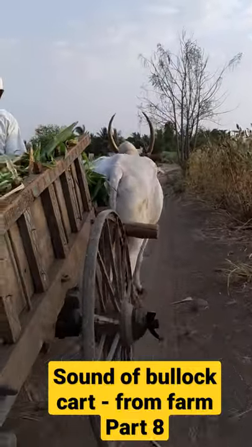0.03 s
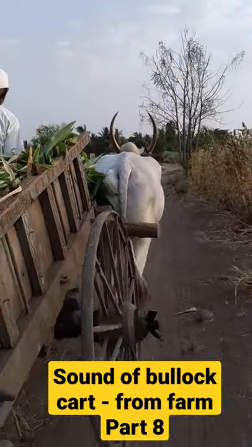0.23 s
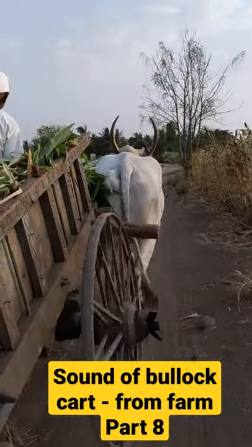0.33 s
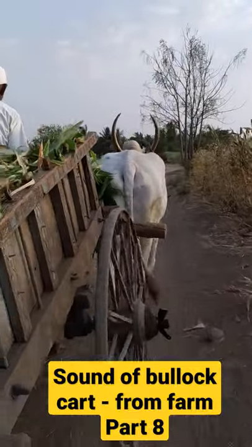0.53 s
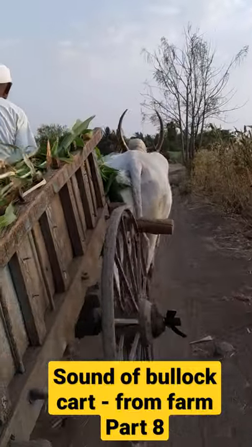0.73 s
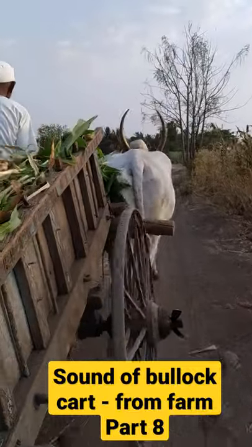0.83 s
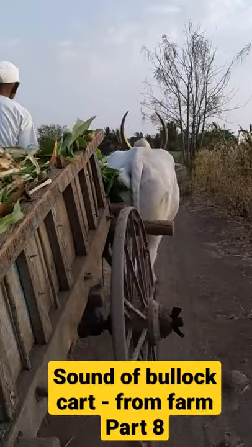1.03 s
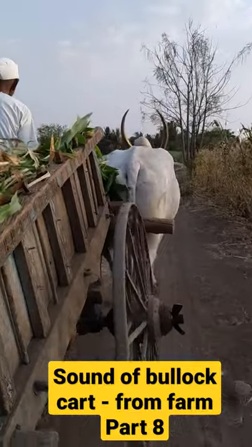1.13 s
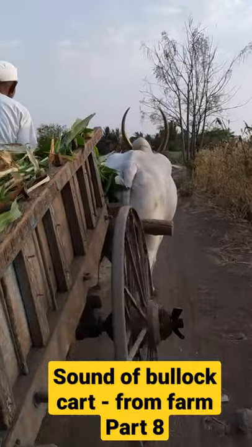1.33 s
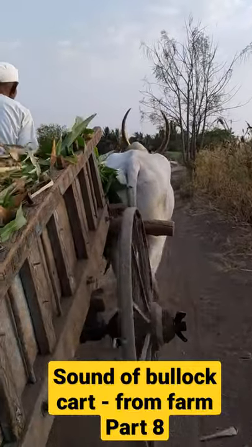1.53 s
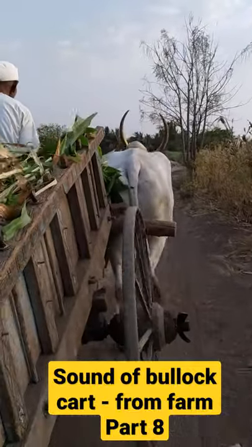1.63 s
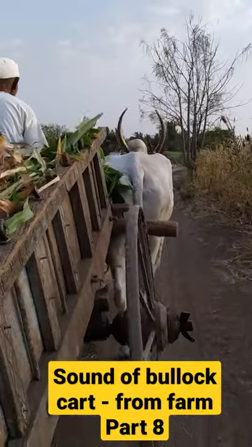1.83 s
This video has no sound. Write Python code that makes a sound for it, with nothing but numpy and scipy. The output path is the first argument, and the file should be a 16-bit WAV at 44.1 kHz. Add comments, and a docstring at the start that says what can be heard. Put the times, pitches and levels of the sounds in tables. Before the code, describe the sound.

Two bright metallic clatters from a rolling bullock cart, with dull wooden knocks and dry cracks between and after them, faint gritty rolling and fading low wind on a dirt track, close stereo phone microphone.

```python
"""Twice loose ironwork clanks in a quick rattle and the iron rings on, as a wooden ox cart rolls by on dirt.
The place is a dirt track; a stereo phone follows close behind the cart, its left microphone the nearer to it.
Iron and planks are decaying modes struck by clicks and short noise; the iron also throws a crash of noise.
The frame knocks, rumbles under random jolts and snaps in bursts of noise; dirt hisses in flickering bands.
Low thuds are short damped sines, and the wind at the microphones is gusty low noise that dies down."""
import sys
import numpy as np
from scipy import signal
from scipy.fft import rfft, irfft
from scipy.io import wavfile
from scipy.ndimage import uniform_filter1d

SR = 44100
rng = np.random.default_rng(int(sys.argv[2]) if len(sys.argv) > 2 else 0)


def transcribe(signal):
    """Save signal, clipped to [-1, 1], as a 16-bit WAV file at the path in sys.argv[1]."""
    frames = np.atleast_2d(signal).T
    limited = np.clip(frames, -1, 1)
    pcm = np.round(limited * 32767).astype(np.int16)
    wavfile.write(sys.argv[1], SR, pcm)


N = 81585

# Blows of the loose ironwork: (time [s], then for each of the six groups of modes: level [dB])
IRON_BLOWS = [(0.22, -32, -19, -24, -30, -20.5, -24), (0.2445, -28, -19.5, -23, -27, -26, -18),
              (0.2477, -29.5, -15, -54, -11, -14.5, -6.5), (0.256, -21.5, -26.5, -47, -23, -8.5, -13.5),
              (0.2601, -39.5, -15, -17, -27, -34, -14), (0.2769, -33.5, -22, -28.5, -26.5, -50, -22),
              (0.3112, -41, -62, -40.5, -60, -33, -34), (0.3297, -50, -55, -44, -42.5, -44, -33),
              (0.5548, -47, -41, -37, -39.5, -41.5, -48), (0.8654, -30.5, -35.5, -25, -26.5, -22.5, -57),
              (0.8875, -24.5, -21.5, -19.5, -19, -44, -21), (0.8955, -20, -14, -17.5, -34, -21, -15.5),
              (0.9, -27, -19, -9, -14.5, -18.5, -12), (0.9056, -20, -25, -18, -40, -10, -19),
              (0.9124, -33, -26, -22, -34, -41, -24.5), (1.1312, -44, -41, -39.5, -46, -49, -35.5)]
# Edges of those groups of modes: [Hz]
GROUP_EDGES_HZ = [900, 2460, 3100, 5900, 7500, 9000, 15500]
# Modes of hub iron and tyre: (frequency [Hz], level [dB], t60 [s])
IRON_MODES = [(1050, -32, 1), (1111, -24.5, 0.35), (1578, -28, 0.29), (2097, -15, 0.24), (2232, -15, 0.43),
              (2343, -13.5, 0.099), (2567, -9.5, 0.12), (2648, -22, 0.1), (3365, -20.5, 0.22),
              (3490, -20.5, 0.16), (4440, 5.5, 0.018), (4790, 10, 0.0096), (5247, -6, 0.05),
              (6760, 1, 0.047), (8066, 8, 0.011), (9830, 1.5, 0.016)]
# Knocks of the frame: (time [s], level [dB], pitch of the planks struck [Hz])
FRAME_KNOCKS = [(0.034, -28.5, 466), (0.074, -33.5, 547), (0.096, -29, 184), (0.163, -37.5, 624),
                (0.197, -32.5, 641.6), (0.222, -17.5, 434), (0.247, -15.5, 436), (0.261, -16, 820),
                (0.298, -25, 1002), (0.629, -37.5, 600), (0.708, -25.5, 246), (0.756, -35, 597),
                (0.788, -32, 610), (0.865, -23, 500), (0.905, -19, 495), (1.041, -31, 536),
                (1.065, -33, 211), (1.128, -34.5, 528), (1.3, -40.5, 577), (1.421, -43, 553),
                (1.459, -36, 660), (1.578, -31, 652), (1.637, -36, 625), (1.682, -28.5, 573),
                (1.694, -31, 207)]
# Modes of the planks: (frequency [Hz], level [dB], t60 [s])
PLANK_MODES = [(203.6, -0.5, 0.062), (248, 1, 0.047), (418.3, -11, 0.064), (481, -5.5, 0.064),
               (553.3, 0, 0.033), (606, -0.5, 0.041), (725, -6.5, 0.039), (815.5, -3.5, 0.046),
               (923, 1, 0.028), (1055, -12.5, 0.043), (1276, -8, 0.051), (1562, -6, 0.035)]
# Dry snaps and scrapes of wood: (time [s], level [dB], low edge [Hz], high edge [Hz], t60 [s])
WOOD_SNAPS = [(0.3956, -15.5, 700, 1260, 0.019), (0.437, -27, 3800, 4670, 0.049),
              (0.47, -34, 1500, 11090, 0.072), (1.0423, -22.5, 1170, 10600, 0.029),
              (1.11, -32, 1160, 11100, 0.16), (1.745, -28, 2200, 2660, .07)]
# The cart's progress: (time [s], level of the frame's rumble [dB], level of the hiss of dirt [dB])
ROLLING_LEVELS = [(0, -54.5, -50.5), (0.199, -48, -47.5), (.36, -42, -48.5), (.52, -46, -50),
                  (0.659, -54, -50), (0.727, -40.5, -45.5), (.84, -53.5, -46), (1.0, -49, -49),
                  (1.15, -51.5, -54), (1.3, -58, -50.5), (1.52, -55.5, -51), (1.698, -47, -47),
                  (1.82, -55, -51)]
# Relative spectrum of the dirt's hiss: (frequency [Hz], level [dB per Hz])
DIRT_COLOUR = [(530, -39), (900, 16), (1070, -3.5), (1340, -3.5), (2190, 1.5), (3960, -1.5), (4410, -9),
               (8450, 4), (16000, -10.5)]
# Low thuds: (time [s], level before a 3 dB lift [dB], pitch [Hz])
LOW_THUDS = [(0.239, -33.5, 32), (0.688, -33, 88.12), (1.107, -43, 60), (1.279, -41, 65),
             (1.547, -43.5, 76), (1.842, -40, 91)]

# ALIKE: share of noise power common to both microphones; PAN: left over right; LAG: right after left
IRON_LAG_S, IRON_ALIKE, IRON_PAN_DB = 0.0001, 0.55, 2.5
SCRAPE_S, SCRAPE_DB = 0.0076, -2.5  # contact noise of a blow: decay time constant, level
RISE_T60_S = 0.0065  # build-up of an iron mode and of the crash
SPLIT = 0.01337  # largest relative distance of a mode's two weaker neighbours
WOBBLE_DB = 3  # bound of the random level wobble of each iron mode, up or down
CRASH_DB, CRASH_T60_S, CRASH_SLOPE = -8, 0.13, 0.55  # dense small modes: t60 at 2 kHz, shorter above
LINGER_DB, LINGER = -19.5, 2.63  # a weaker part of the crash lasts this many times longer
CRACKLE_DB = 2  # grain of the crash

WOOD_LAG_S, WOOD_ALIKE, WOOD_PAN_DB = 0.00021, 0.96, 0.5
KNOCK_S, KNOCK_RISE_T60_S = 0.0069, 0.016  # time to the peak of a knock's push; mode build-up at 500 Hz
SPREAD_OCT, FAR_DB = 0.18, -9  # reach of a knock around its pitch; share of every plank, near or far
RASP_DB = 17  # the rasp of wood on wood in each knock
RUMBLE_PER_S, RUMBLE_SCATTER_DB = 630, 1.5  # mean rate of jolts on each mode; scatter common to all
SNAP_PAN_DB = 1.9

DIRT_FLICKER_DB = 1.7
WIND_HZ, WIND_ALIKE, WIND_PAN_DB = 43, 0.73, 1.5
WIND_DB, WIND_DB_PER_S = -48.5, -4.5  # the wind dies down
TOP_HZ = 15700


def iron():
    """Each blow, a click with a short scrape, rings the modes and throws a crash of many small ones."""
    rows = np.array(IRON_BLOWS)
    t = np.arange(13230) / SR
    fade = np.exp(-t[:882] / SCRAPE_S)
    scrape_gain = undb(SCRAPE_DB) / np.sqrt(SCRAPE_S * SR / 2)
    click = t[:len(fade)] == 0
    blows = [scrape_gain * pair(len(fade), IRON_ALIKE) * fade + click for _ in rows]
    bursts = [pair(len(t), IRON_ALIKE) for _ in rows]
    # each mode is a close trio, the outer two 5 dB weaker
    trios = [(hz * (1 + SPLIT * step * rng.uniform(0.34, 1)), db - 5 * abs(step), t60)
             for hz, db, t60 in IRON_MODES for step in (-1, 0, 1)]
    out = 0
    for k, (lo, hi) in enumerate(zip(GROUP_EDGES_HZ, GROUP_EDGES_HZ[1:])):
        gains = undb(rows[:, k + 1])
        force = place(rows[:, 0], gains, blows)
        for hz, db, t60 in trios:
            if lo <= hz < hi:
                wobble = WOBBLE_DB * np.tanh(walk(70.88))
                out = out + undb(db + wobble) * swell(force, hz, t60, RISE_T60_S)
        out = out + crash(rows[:, 0], gains, bursts, lo, hi)
    return ports(out, IRON_LAG_S, IRON_PAN_DB)


def crash(times, gains, bursts, lo, hi):
    """Modes too dense to hear apart: noise in one band with a swift rise, a decay and a weak longer tail."""
    t = np.arange(bursts[0].shape[1]) / SR
    t60 = CRASH_T60_S * (np.sqrt(lo * hi) / 2000) ** -CRASH_SLOPE
    decay = undb(-60 * t / t60)
    linger = undb(LINGER_DB - 60 * t / (LINGER * t60))
    rise = (1 + undb(LINGER_DB)) * undb(-60 * t / RISE_T60_S)
    tail = decay + linger - rise
    noise = place(times, gains, [burst * tail for burst in bursts])
    crackling = noise * undb(CRACKLE_DB * walk(500))
    width_gain = np.sqrt(SR / 2 / (hi - lo))  # makes up for the power lost in a narrow band
    return undb(CRASH_DB) * width_gain * band(crackling, max(lo, 1900), hi)


def frame():
    """Soft knocks favour the planks near their pitch; many small jolts, each plank its own, keep up a rumble."""
    rows = np.array(FRAME_KNOCKS)
    times, levels, pitches = rows.T
    t = np.arange(1764) / SR
    fade = t * np.exp(-t / KNOCK_S)
    fade = fade / np.sqrt(np.sum(fade ** 2))
    # a click opens each push
    pushes = [pair(len(t), WOOD_ALIKE) * fade + (t == 0) for _ in rows]
    jolt_force = undb(RUMBLE_SCATTER_DB * walk(34.81))
    knocks = rumble = 0
    for hz, db, t60 in PLANK_MODES:
        octaves = np.log2(hz / pitches)
        near = np.exp(-0.5 * (octaves / SPREAD_OCT) ** 2) + undb(FAR_DB)
        push = place(times, undb(levels) * near, pushes)
        knocks = knocks + undb(db) * swell(push, hz, t60, KNOCK_RISE_T60_S * 500 / hz)
        struck = rng.random(N) < RUMBLE_PER_S / SR
        jolts = struck * pair(N, WOOD_ALIKE) * jolt_force * undb(4.8 * walk(20.37))
        rumble = rumble + undb(db) * ring(jolts, hz, t60)
    rubbing = place(times, undb(levels), [push * (t > 0) for push in pushes])  # without the click
    rasp = undb(RASP_DB) * band(rubbing, 1030, 3740)
    planks = band(knocks + curve(column=1) * unit(rumble), 99, 6300)
    return ports(rasp + planks, WOOD_LAG_S, WOOD_PAN_DB)


def snaps():
    """Short cracks without a ring: decaying noise, each in its own band."""
    rows = np.array(WOOD_SNAPS)
    t = np.arange(4410) / SR
    onset = 1 - np.exp(-t / 0.00083)
    cracks = []
    for _, _, lo, hi, t60 in WOOD_SNAPS:
        burst = pair(len(t), IRON_ALIKE) * undb(-60 * t / t60) * onset
        cracks.append(band(burst, lo, hi))
    return ports(place(rows[:, 0], undb(rows[:, 1]), cracks), IRON_LAG_S, SNAP_PAN_DB)


def dirt():
    """Hiss under the wheel: third-octave bands of noise that flicker, unrelated left and right."""
    colour = np.array(DIRT_COLOUR)
    out = 0
    for hz in 1000 * 2 ** np.arange(0, 4.1, 1 / 3):
        db = np.interp(np.log(hz), np.log(colour[:, 0]), colour[:, 1])
        flicker = DIRT_FLICKER_DB * walk(30.18)
        pan = sides(4 if hz > 8000 else 1.1)
        hiss = band(rng.standard_normal((2, N)), hz / 2 ** (1 / 6), hz * 2 ** (1 / 6))
        out = out + undb(db + flicker) * pan * hiss
    return unit(out) * curve(column=2)


def thuds():
    """Low damped sines of about one cycle, stronger on the left."""
    t = np.arange(4410) / SR
    left_right = np.array([[1.3], [0.75]])
    shapes = [np.sin(2 * np.pi * hz * t) * np.exp(-t * hz * 1.22) * left_right for _, _, hz in LOW_THUDS]
    rows = np.array(LOW_THUDS)
    return place(rows[:, 0], undb(rows[:, 1] + 3), shapes)


def wind():
    """Wind pushes at the microphones: partly shared low noise that gusts and dies down."""
    flutter = unit(band(pair(N, WIND_ALIKE), WIND_HZ / 4.2, WIND_HZ * 1.3))
    gusts = undb(2.1 * walk(8.61))
    dying = undb(WIND_DB + WIND_DB_PER_S * np.arange(N) / SR)
    return flutter * gusts * sides(WIND_PAN_DB) * dying


def undb(db):
    """Decibels to gain."""
    return 10 ** (np.asarray(db) / 20)


def unit(x):
    """Scale to an RMS of 1."""
    return x / np.sqrt(np.mean(x ** 2))


def curve(column):
    """Gain along one column of ROLLING_LEVELS, straight in dB between its times."""
    rows = np.array(ROLLING_LEVELS)
    return undb(np.interp(np.arange(N) / SR, rows[:, 0], rows[:, column]))


def ring(x, hz, t60):
    """One decaying mode as a two-pole resonator; a unit click gives a unit sine."""
    r = np.exp(-np.log(1000) / (t60 * SR))
    w = 2 * np.pi * hz / SR
    return signal.lfilter([0, r * np.sin(w)], [1, -2 * r * np.cos(w), r * r], x)


def swell(x, hz, t60, rise_t60):
    """A mode that builds up: the same mode with another decay, rise_t60, is taken away from it."""
    return ring(x, hz, t60) - ring(x, hz, rise_t60)


def band(x, lo_hz, hi_hz):
    """Band-pass between two edges."""
    return signal.sosfilt(signal.butter(2, [lo_hz, hi_hz], "band", fs=SR, output="sos"), x)


def pair(size, alike):
    """Left and right noises that share a part of their power."""
    noise = rng.standard_normal((3, size))
    return np.sqrt(alike) * noise[0] + np.sqrt(1 - alike) * noise[1:]


def walk(rate):
    """Random levels slewed at rate per s, spread 1."""
    k = int(SR / rate)
    steps = np.repeat(rng.standard_normal(N // k + 1), k)
    return unit(uniform_filter1d(steps, k)[:N])


def place(times, gains, shapes):
    """Lay each two-channel shape down at its time."""
    out = np.zeros((2, N + shapes[0].shape[1]))
    for s, gain, shape in zip(times, gains, shapes):
        i = int(s * SR)
        out[:, i:i + shape.shape[1]] += gain * shape
    return out[:, :N]


def sides(pan_db):
    """Left and right gains, pan_db apart."""
    return undb(pan_db * np.array([[0.5], [-0.5]]))


def ports(x, lag_s, pan_db):
    """The right microphone, farther off, hears the cart later and weaker."""
    hz = np.fft.rfftfreq(2 * N, 1 / SR)
    late = irfft(rfft(x[1], 2 * N) * np.exp(-2j * np.pi * hz * lag_s))[:N]
    return np.array([x[0], late]) * sides(pan_db)


def scene():
    """The cart's iron and wood over the dirt, the thuds and the wind."""
    return iron() + frame() + snaps() + dirt() + thuds() + wind()


def record(dry):
    """The phone rounds the loudest peaks and cuts the treble above TOP_HZ."""
    rounded = 0.85 * np.tanh(dry / 0.85)
    return signal.sosfilt(signal.ellip(12, 0.2, 100, TOP_HZ, fs=SR, output="sos"), rounded)


dry = scene()
out = record(dry)
transcribe(out)
```